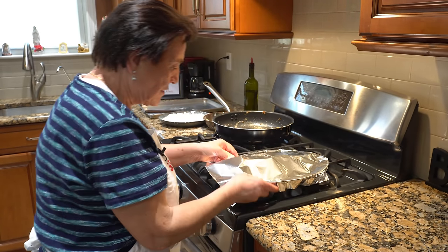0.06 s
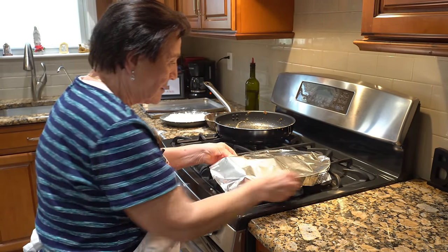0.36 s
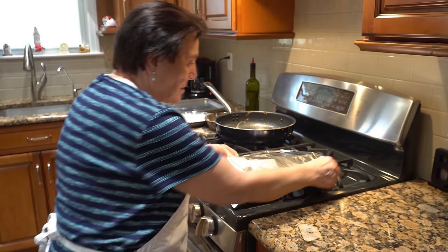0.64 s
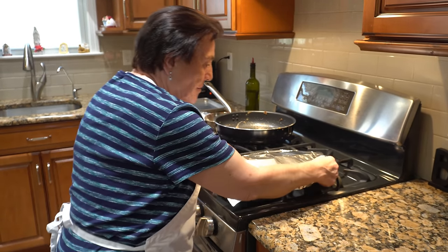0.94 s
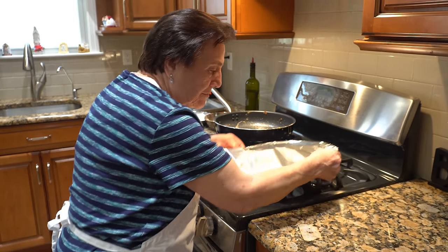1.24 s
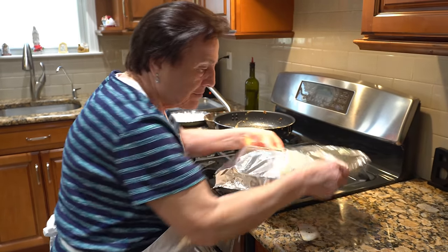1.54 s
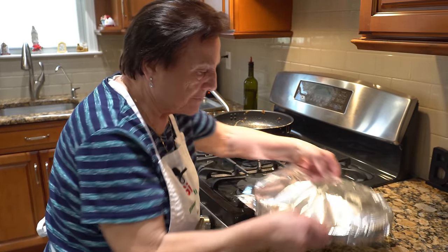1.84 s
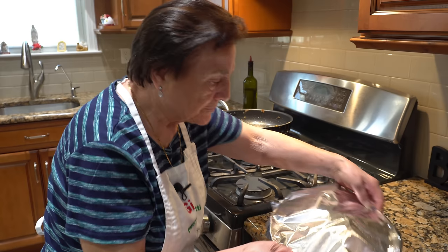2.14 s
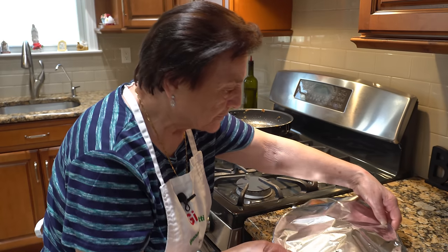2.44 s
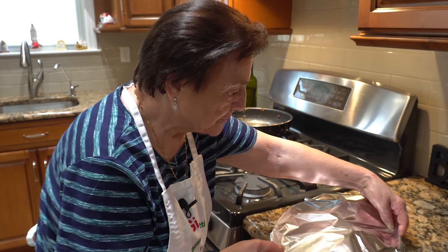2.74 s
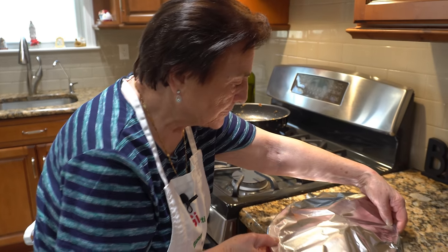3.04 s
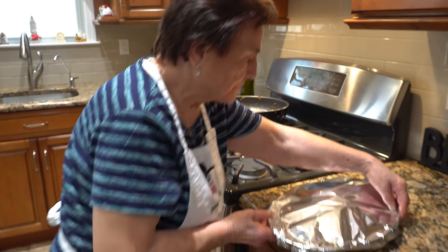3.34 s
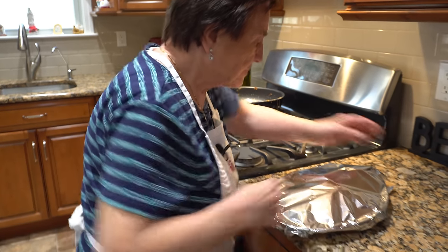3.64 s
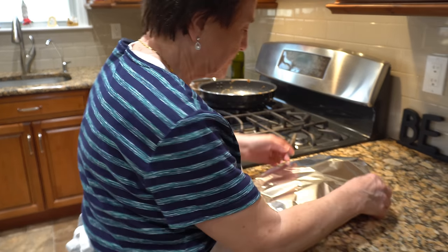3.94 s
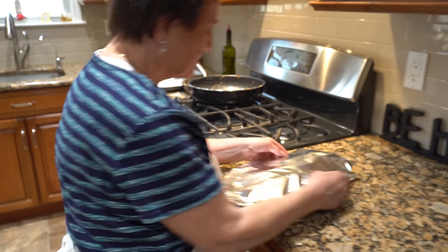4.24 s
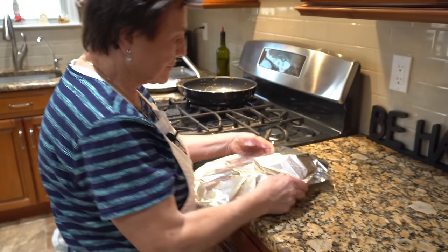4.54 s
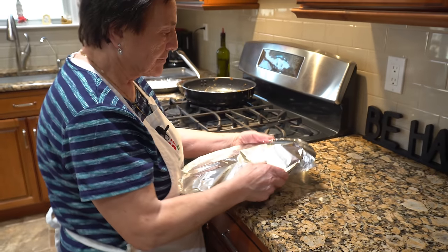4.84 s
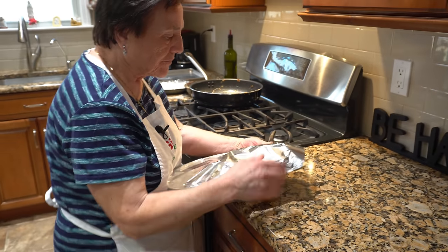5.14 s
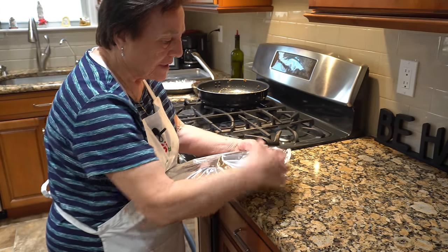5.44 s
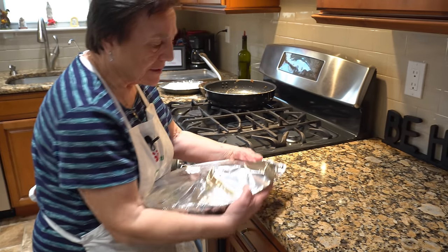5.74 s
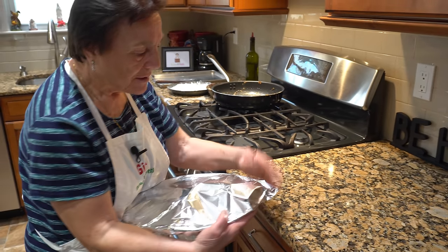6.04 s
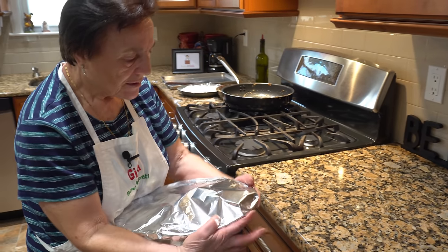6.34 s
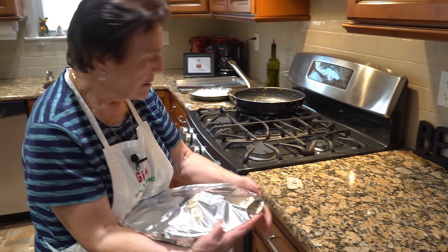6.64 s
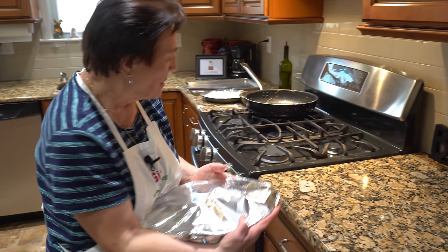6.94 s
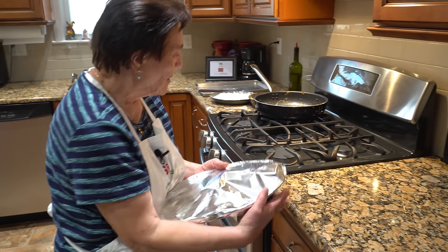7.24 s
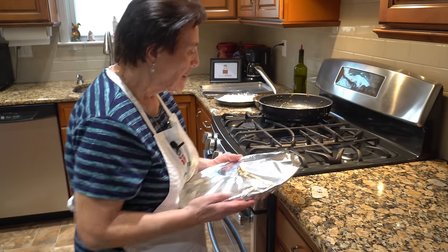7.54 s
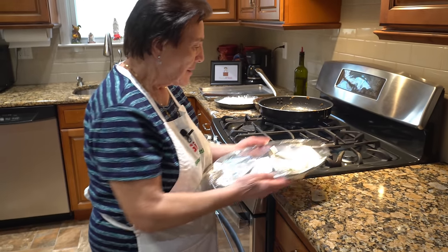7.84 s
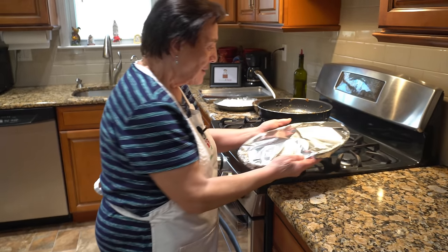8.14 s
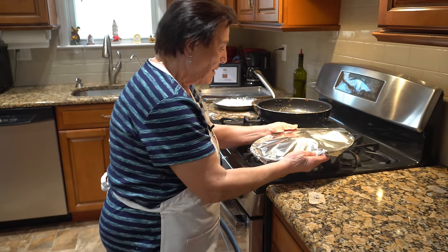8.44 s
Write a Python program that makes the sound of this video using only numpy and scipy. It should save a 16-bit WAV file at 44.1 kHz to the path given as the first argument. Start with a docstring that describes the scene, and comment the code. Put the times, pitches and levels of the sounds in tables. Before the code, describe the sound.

Close by in a small, quiet kitchen, fingers press aluminium foil over a ceramic dish, making bright bursts of crinkling and single snaps. The dish squeaks faintly on a stove grate, then lands on a stone counter with one sharp knock. It scrapes and clunks briefly as the crinkling grows louder and busier, and a light clink comes at the end.

```python
"""Crimping foil over a dish

Fingers press aluminium foil over a ceramic dish in a small tiled kitchen; creases buckle in swarms
and single snaps. The dish squeaks off the stove grate, knocks down on the stone counter, is dragged
off its edge and clinks back on the stove. Hands and cloth add soft low bumps over a quiet room."""
import sys
import numpy as np
from scipy import signal
from scipy.fft import rfft, irfft, next_fast_len
from scipy.io import wavfile
from scipy.ndimage import uniform_filter1d, map_coordinates

SR = 44100
rng = np.random.default_rng(int(sys.argv[2]) if len(sys.argv) > 2 else 0)


def bounce(signal):
    """Save signal as a 16-bit WAV file at the path given by the first command-line argument."""
    frames = np.transpose(np.atleast_2d(signal))
    limited = np.clip(frames, -1, 1)
    pcm = np.round(limited * 32767).astype(np.int16)
    wavfile.write(sys.argv[1], SR, pcm)


N = 383042

# Fingers squeezing the foil. Each row: start and length in seconds, then crinkle level,
# top-octave shelf and flexing of the whole sheet, all in relative dB.
SQUEEZES = [(0, 0.11, -35, 11.5, -50.5), (0.168, 0.22, -37.5, 2, -43.5), (0.314, 0.12, -36.5, 9.5, -52.5),
            (0.541, 0.021, -48.5, 6, -55), (0.731, 0.11, -42, 8, -50.5), (0.802, .055, -36.5, 7, -52),
            (0.888, 0.12, -41, 5.5, -45.5), (1.46, .03, -53, -12, -51), (1.647, 0.084, -44, 8.5, -57),
            (1.85, 0.029, -40, 9.5, -52), (2.044, 0.03, -41, 5, -59.5), (2.146, 0.029, -44, -12, -50),
            (2.479, 0.038, -51.5, 0.5, -79), (2.892, 0.21, -49.5, -7, -52.5), (3.105, 0.044, -33, -1, -55),
            (3.163, .17, -41, 0, -41), (3.38, 0.035, -43.5, 3.5, -52.5), (3.446, 0.012, -39, 6.5, -48.5),
            (3.985, 0.15, -37.5, -1.5, -53.5), (4.038, 0.1, -34.5, 2.5, -52),
            (4.106, 0.16, -32.5, 6.5, -47), (4.261, .26, -35.5, 1.5, -41), (4.661, 0.13, -31.5, 9.5, -44),
            (4.889, 0.095, -35.5, 8, -51.5), (4.969, .11, -39, 1.5, -53), (5.447, 0.042, -27, 10.5, -35),
            (5.546, .1, -32, 4.5, -40.5), (5.687, 0.11, -43, -9, -54.5), (5.859, 0.065, -43, -10, -55),
            (6.102, .025, -37.5, 3, -35), (6.121, 0.054, -28.5, 6.5, -42), (6.231, 0.074, -36, -7, -45),
            (6.303, 0.12, -35, 0, -44.5), (6.438, .06, -46.5, 1.5, -52), (6.567, 0.057, -33.5, 0.5, -44.5),
            (6.647, 0.057, -44, -24, -52.5), (6.878, 0.046, -33.5, 8, -39.5),
            (6.898, 0.076, -30.5, 9.5, -46), (6.996, 0.065, -36, 1, -47), (7.069, 0.12, -30, 8, -41),
            (7.223, 0.028, -39.5, -2, -53), (7.478, 0.026, -33, 1, -45), (7.561, 0.13, -42, -1.5, -52),
            (7.804, .03, -55.5, -26, -64), (7.972, 0.031, -46.5, -3, -58), (8.27, .04, -47, 4.5, -58),
            (8.372, 0.043, -50, -15, -80), (8.503, 0.11, -45, 2, -52), (8.625, 0.025, -43.5, 4, -37)]
# Faint foil rustle under hands that only hold the dish. Each row: time in seconds, level in dB.
GRIP_RUSTLE = [(0, -32), (.5, -56.5), (1.1, -45.5), (1.38, -60.5), (1.95, -48.5), (2.42, -65.5), (3.4, -47),
               (3.68, -73), (3.95, -63.5), (4.55, -45.5), (5.2, -58), (5.85, -47), (6.04, -70), (6.5, -48),
               (6.85, -59.5), (7.42, -66), (7.75, -50.5), (8.68, -65.5)]
# Single creases giving way. Each row: start in seconds, level in dB, top-octave shelf in dB,
# time to die by 60 dB (t60) in seconds.
CREASE_SNAPS = [(0.1968, -34, 6, 0.091), (0.5197, -41.5, -2, 0.14), (.6478, -41, 3.5, 0.35),
                (0.9124, -38.5, 15.5, 0.12), (1.0669, -32, 7, 0.13), (1.1412, -32, 3, 0.14),
                (1.2692, -47.5, 8, 0.2), (1.2923, -44, 1.5, 0.14), (1.4053, -38, 2, .16),
                (1.5164, -47.5, 8, .088), (1.8112, -38.5, 11, 0.23), (2.0271, -41.5, 14.5, .21),
                (2.1842, -38.5, 1.5, 0.12), (2.3061, -44.5, -1, 0.095), (2.4663, -48, -10, 0.13),
                (2.5975, -45.5, 16, 0.04), (2.646, -41.5, -2, 0.34), (2.7614, -36, 5, 0.086),
                (2.8706, -45.5, 8, 0.06), (2.8874, -41, -1, .045), (3.375, -28.5, 5, .027),
                (3.483, -29, -14, .032), (4.1747, -37, 1, .03), (4.4122, -35, 15.5, 0.36),
                (4.758, -28, 3, 0.031), (4.789, -24.5, -7, 0.041), (4.899, -34.5, 10.5, .1),
                (5.2383, -46.5, 4, 0.099), (5.3013, -39.5, -6.5, 0.28), (5.592, -32.5, -13, .1),
                (5.748, -31, 8, .15), (5.765, -28.5, 1, 0.017), (5.7868, -28.5, -11, .02),
                (5.918, -36.5, 4.5, 0.082), (6.1037, -38.5, -2.5, .15), (6.3192, -24.5, -7.5, 0.03),
                (6.365, -27, -14, .06), (6.385, -28.5, 10.5, 0.17), (6.5391, -36.5, -4, 0.034),
                (6.5999, -36, 15, 0.11), (6.678, -36, 3.5, 0.2), (6.859, -45, -5, 0.26),
                (7.0412, -27.5, 13, 0.099), (7.1878, -27.5, 7, 0.059), (7.2433, -31, 8, .1),
                (7.487, -31.5, 0, 0.32), (7.742, -34.5, 7, 0.1), (8.1175, -51.5, 15.5, .066),
                (8.1764, -42.5, 13.5, .1), (8.365, -41.5, 6.5, 0.13), (8.4824, -48.5, 7, .17),
                (8.5035, -38, 2.5, .2)]
# Tone of the fine creases and of the whole sheet. Each row: frequency in Hz, relative gain in dB.
CREASE_EQ = [(400, -31.5), (900, -8), (1400, -2), (2000, 2.5), (2800, 2.5), (4000, 3), (6000, -0.5),
             (9000, -7.5), (12000, -11), (14500, -16), (16000, -25)]
SHEET_EQ = [(80, -21), (160, -16), (260, -2), (400, 0), (560, 2), (800, -1.5), (1100, -6.5), (1500, -3),
            (1900, -1), (3500, -52)]
# The dish meeting grate and counter. Each row: start in seconds, relative level in dB,
# clink over clunk in dB.
DISH_HITS = [(0.228, -32, 3), (0.952, -24.5, -3), (2.153, -42, 2), (2.646, -30, -8), (2.858, -32.5, -7),
             (3.1124, -12, 1), (3.119, -8, 2.5), (3.1338, -12.5, -11), (3.293, -25.5, -3.5),
             (4.174, -18.5, 2.5), (4.29, -32.5, 12.5), (4.384, -20, -8), (4.394, -27, -6),
             (4.403, -16.5, -19), (5.107, -32.5, -15), (8.628, -23.5, 9), (8.654, -30.5, -16),
             (8.674, -37, -11)]
# Modes of the dish and what it lands on. Each row: pitch in Hz, relative level in dB, t60 in seconds.
DISH_MODES = [(188, -12, .12), (404, -13, .11), (660, -13, .06), (735, -3, .07), (876, -3, .08),
              (925, -5, .07), (1094, -17, .08), (1200, -15, .07), (1368, -16, .08), (1500, -16, .08),
              (1585, -8, .08), (1688, 1, .06), (1765, -14, .05), (2405, -19, .08), (2611, -5.5, .07)]
# The dish scraping the counter, making the iron grate sing, and squeaking on it.
# Each row: time in seconds, level in dB.
SCRAPE_FADER = [(4.18, -44), (4.26, -44), (4.285, -36), (4.34, -32), (4.375, -27), (4.41, -26.5),
                (4.425, -37), (4.50, -45), (4.56, -60)]
GRATE_FADER = [(0, -53), (0.45, -55), (0.62, -62), (0.8, -55), (1.1, -60), (1.9, -67)]
SQUEAK_FADER = [(0.09, -72), (0.105, -36), (0.13, -34.5), (0.15, -46), (0.18, -71)]
# Tone of the dish's foot on stone. Each row: frequency in Hz, relative gain in dB.
SCRAPE_EQ = [(80, -23), (170, -21), (240, -1), (320, -12), (400, 2.5), (480, -4), (650, 1), (760, -13),
             (850, 5.5), (980, -7), (1180, -5), (1450, -24), (1750, -6), (2100, -25), (3000, -24),
             (6000, -64.5)]
# Arms and apron moving. Each row: time in seconds, level in dB.
CLOTH_FADER = [(0, -79), (.75, -55.5), (1.0, -49), (1.25, -57.5), (2.2, -58), (2.4, -77), (3.05, -66.5),
               (3.2, -53.5), (3.9, -56), (4.42, -47), (4.65, -68), (5.43, -61.5), (5.62, -46), (6.05, -65),
               (7.35, -61), (7.6, -52), (8.1, -69), (8.68, -72)]
# Soft bumps of hands and body. Each row: start in seconds, relative level in dB, pitch in Hz.
BODY_BUMPS = [(0.953, -39, 90), (1.005, -37, 60), (1.31, -44, 202), (3.12, -32, 86), (3.596, -43, 69.5),
              (3.771, -38.5, 172), (3.846, -43, 327), (3.921, -40, 315), (4.036, -44, 85.5),
              (5.47, -38.5, 70), (7.408, -43.5, 217), (7.514, -40, 49), (7.643, -39, 190)]
# Tone of the handling rumble and of the room's air. Each row: frequency in Hz, relative gain in dB.
RUMBLE_EQ = [(12, -27.5), (22, 4.5), (50, 4), (100, 0.5), (170, -3), (260, -9.5), (500, -47)]
AIR_EQ = [(25, 6.5), (100, 0.5), (300, -5.5), (600, -1), (1000, -3), (2200, -3.5), (4000, -16.5),
          (10000, -23), (16000, -29)]
# The kitchen's reverb tail. Each row: frequency in Hz, t60 in seconds.
KITCHEN_DECAY = [(150, 0.28), (1000, 0.55), (3000, 0.45), (7000, 0.24), (15000, 0.025)]

CREASES_PER_S, CREASE_GROWTH, MEDIUM_PRESS_DB = 2600, .4, -36  # rate at a medium press; its power law
ATTACK_S, ATTACK_SHARE = .012, 0.13  # a squeeze builds in this time plus a share of its length
SAG_DB_PER_S, RELEASE_DB_PER_S = 8.5, 231.5  # it eases while held, then lets go
TOP_RELEASE_DB_PER_S, FLEX_RELEASE_DB_PER_S = 326.5, 143.5  # fine creases stop first, the sheet last
UNEVEN_DB, UNEVEN_PER_S = 1.12, 50  # fingers never press quite evenly
GRIP_TOP_DB, GRIP_FLEX_DB = -13, -6.5  # light holding is dull and hardly flexes the sheet


def foil_crinkle(press_db, top_db, flex_db):
    """Harder pressing buckles more creases a second, while the whole sheet crackles lower down."""
    force_db = press_db - MEDIUM_PRESS_DB
    rate = CREASES_PER_S * amp(CREASE_GROWTH * force_db)
    creases = unit(eq(click_swarm(rate, spread_db=6.5, ring_db=5, facets=5), CREASE_EQ))
    panels = amp(-2.5 + 0.41 * force_db) * panel_pings(per_s=24, centre_hz=2670, t60=0.044)
    sheet = unit(eq(click_swarm(rate, spread_db=6, ring_db=6.5), SHEET_EQ))
    return amp(press_db - 0.5) * (top_shelf(creases, top_db) + panels) + amp(flex_db - 1.0) * sheet


def click_swarm(per_s, spread_db, ring_db, facets=3, t60=0.03, block=4096):
    """Uneven clicks at a steady mean level; each block has a few facets, each with its own ring."""
    clicks = (rng.random(N) < per_s / SR) * amp(spread_db * np.clip(rng.standard_normal(N), -2, 2.3))
    blocks = np.pad(clicks, (0, -N % block)).reshape(-1, block)
    facet_clicks = blocks * (rng.integers(facets, size=blocks.shape) == np.arange(facets)[:, None, None])
    t = np.arange(block + 1) / SR
    rings = rng.standard_normal((facets, len(blocks), len(t))) * amp(-60 * t / t60)
    rings *= amp(ring_db) / np.linalg.norm(rings, axis=2, keepdims=True)
    rings[:, :, 0] += rng.choice([-1, 1], rings.shape[:2])  # the bare click ahead of its ring
    rung = signal.fftconvolve(facet_clicks, rings, axes=2).sum(axis=0)
    spill = np.roll(rung[:, block:], 1, axis=0)  # tails run on into the next block
    crackle = unit((rung[:, :block] + spill).ravel()[:N])
    power = np.abs(uniform_filter1d(uniform_filter1d(crackle ** 2, size=1500), size=1500))
    return unit(crackle / np.sqrt(power + 0.04))


def panel_pings(per_s, centre_hz, t60):
    """Now and then a flat panel of foil flips over with a short pitched ping."""
    out, t = np.zeros(N), np.arange(SR // 20) / SR
    for when, pitch, size in rng.random((int(per_s * N / SR), 3)):
        hz = centre_hz * 2 ** (pitch - .5)
        add(out, when * N / SR, size ** 2 * np.sin(2 * np.pi * hz * t) * amp(-60 * t / t60))
    return out


def finger_pressure():
    """The fingers ride three controls, in dB: crinkle level, top-octave shelf and sheet flex."""
    level_db, top_db, flex_db = np.transpose(SQUEEZES)[2:]
    press = squeeze_envelope_db(level_db, RELEASE_DB_PER_S, grip_db=0)
    top = squeeze_envelope_db(level_db + top_db, TOP_RELEASE_DB_PER_S, GRIP_TOP_DB)
    flex = squeeze_envelope_db(flex_db, FLEX_RELEASE_DB_PER_S, GRIP_FLEX_DB)
    wobble = map_coordinates(rng.standard_normal(1024), [np.arange(N) * UNEVEN_PER_S / SR], mode="wrap")
    return press + UNEVEN_DB * wobble, top - press, flex


def squeeze_envelope_db(levels_db, release_db_per_s, grip_db):
    """Each squeeze swells, sags and lets go, on top of the rustle of the grip."""
    t = np.arange(SR) / SR
    power = amp(automation(GRIP_RUSTLE) + grip_db) ** 2
    for (start, length, *_), db in zip(SQUEEZES, levels_db):
        fall_db = SAG_DB_PER_S * t + release_db_per_s * np.maximum(t - length, 0)
        rise = np.minimum(t / (ATTACK_S + ATTACK_SHARE * length), 1)
        add(power, start, (rise * amp(db - fall_db)) ** 2)
    return 10 * np.log10(power)


def crease_snaps():
    """A crease pops with a sharp tick and sets off a dying shiver of the sheet."""
    out, t = np.zeros(N), np.arange(SR // 5) / SR
    shiver_eq = [(100, -6.5), (400, 0.5), (1200, -1), (2500, 6.5), (4500, 5.5), (8000, -2.5),
                 (15000, -16)]
    tick = .5 * amp(-60 * t / 0.00052)
    for start, db, top_db, t60 in CREASE_SNAPS:
        grains = rng.standard_normal(len(t)) * amp(2.7 * rng.standard_normal(len(t)))
        shiver = top_shelf(unit(eq(grains, shiver_eq)), top_db)
        add(out, start, amp(db) * shiver * (amp(-60 * t / t60) + tick))
    return out


def dish_knocks(clink_above_hz=1450):
    """Each hit rings the dish's modes: a hard edge favours the clink, a flat landing the low clunk."""
    out, t = np.zeros(N), np.arange(SR // 5) / SR
    hz, level_db, t60 = np.transpose(DISH_MODES)[:, :, None]
    polarity = (-1) ** np.arange(len(hz))[:, None]
    thud_eq = [(60, -16.5), (200, 2), (500, 0), (900, 6.0), (1800, 2), (3000, -19), (7000, -35.0)]
    attack = 1 - np.exp(-t / .0004)
    for start, db, clink_db in DISH_HITS:
        strength_db = level_db + clink_db * (hz > clink_above_hz) + rng.normal(0, 1, hz.shape)
        # Hands and loose foil load the dish, so its modes waver.
        waver = .03 * np.cumsum(rng.standard_normal((len(hz), len(t))), axis=1)
        modes = polarity * amp(strength_db - 60 * t / t60) * np.sin(2 * np.pi * hz * t + waver)
        thud = unit(eq(rng.standard_normal(len(t)), thud_eq)) * amp(-60 * t / 0.14)
        add(out, start, amp(db - 6.5) * (modes.sum(axis=0) + .5 * thud) * attack)
    return out


def dish_drag(grate_hz=830, grate_q=18, squeak_hz=597):
    """The dish's foot sticks and slips on stone; on the iron grate it rings the bars and squeaks once."""
    slips = unit(eq(click_swarm(per_s=600, spread_db=4.5, ring_db=-2.0), SCRAPE_EQ))
    bars = unit(signal.lfilter(*signal.iirpeak(grate_hz, grate_q, SR), rng.standard_normal(N)))
    jitter = np.cumsum(rng.normal(0, .04, N))
    squeak = np.sqrt(2) * np.sin(2 * np.pi * squeak_hz * np.arange(N) / SR + jitter)
    return fader(SCRAPE_FADER) * slips + fader(GRATE_FADER) * bars + fader(SQUEAK_FADER) * squeak


def handling(flex_db, push_db=-7, lumps_per_s=22):
    """Lumpy low rustle of moving arms and of hands pushing as the sheet flexes, with a few dull bumps."""
    lumps_db = map_coordinates(rng.normal(0, 4, 300), [np.arange(N) * lumps_per_s / SR])
    rumble = unit(amp(lumps_db) * eq(rng.standard_normal(N), RUMBLE_EQ))
    out = np.hypot(amp(automation(CLOTH_FADER)), amp(flex_db + push_db)) * rumble
    t = np.arange(SR // 10) / SR
    for start, db, hz in BODY_BUMPS:
        envelope = np.exp(-t * hz / 0.67) * (1 - np.exp(-t / 0.0011))
        add(out, start, amp(db + 7.5) * np.sin(2 * np.pi * hz * t) * envelope)
    return out


def kitchen_reverb(send, predelay_s=.005, block=8192):
    """Tiles and cupboards give a short tail, treble dying first; the paths change as the cook moves."""
    out = np.zeros(N)
    for start in range(0, N, block):
        hz, t, noise = signal.stft(rng.standard_normal(SR // 2), SR, nperseg=256)
        decay = amp(-60 * t / at_hz(KITCHEN_DECAY, hz)[:, None])
        tail = signal.istft(noise * decay, SR, nperseg=256)[1]
        wet = signal.fftconvolve(send[start:start + block], tail / np.linalg.norm(tail))
        add(out, start / SR + predelay_s, wet)
    return out


def room_air():
    """A faint, steady bed of dark room tone."""
    return amp(-63.0) * unit(eq(rng.standard_normal(N), AIR_EQ))


def amp(db):
    return 10 ** (np.asarray(db) / 20)


def unit(x):
    return x / np.sqrt(np.mean(x ** 2) + 1e-20)


def at_hz(points, hz):
    """Read (Hz, value) points along a log frequency axis."""
    point_hz, values = np.transpose(points)
    return np.interp(np.log(hz + 1), np.log(point_hz + 1), values)


def automation(rows, outside=None):
    """Level in dB at every sample; the ends hold unless an outside level is given."""
    times, db = np.transpose(rows)
    return np.interp(np.arange(N) / SR, times, db, left=outside, right=outside)


def fader(rows):
    """Gain from (seconds, dB) rows, silent outside them."""
    return amp(automation(rows, outside=-np.inf))


def add(track, start_s, sound):
    """Mix a sound into the track."""
    part = track[max(round(start_s * SR), 0):][:len(sound)]
    part += sound[:len(part)]


def eq(x, curve):
    """Minimum-phase EQ through (Hz, dB) points, so nothing rings ahead of a click."""
    size = 2 * next_fast_len(len(x) // 2 + 4096, True)
    gain = amp(at_hz(curve, np.fft.rfftfreq(size, 1 / SR)))
    cepstrum = irfft(np.log(gain + 1e-6))
    cepstrum[1:size // 2] *= 2
    cepstrum[size // 2 + 1:] = 0
    return irfft(rfft(x, size) * np.exp(rfft(cepstrum)))[:len(x)]


def top_shelf(x, top_db, corner_hz=7500):
    """Boost or cut the top octave."""
    size = next_fast_len(len(x), True)
    hz = np.fft.rfftfreq(size, 1 / SR)
    top = irfft(rfft(x, size) * hz ** 4 / (hz ** 4 + corner_hz ** 4), size)[:len(x)]
    return x + (amp(top_db) - 1) * top


def scene():
    """Mono mix: foil and dish up front with a little kitchen reverb, handling and air underneath."""
    press_db, top_db, flex_db = finger_pressure()
    foil = foil_crinkle(press_db, top_db, flex_db) + crease_snaps()
    dish = dish_knocks() + dish_drag()
    air = room_air()
    reverb = kitchen_reverb(amp(-16.5) * foil + amp(-14) * dish)
    return (foil + dish + reverb + handling(flex_db) + air)[None]


def record(dry):
    """A soft clip rounds off the loudest peaks, then a steep high cut takes off the very top."""
    ceiling, high_cut_hz = .56, 16100
    rounded = dry / (1 + (np.abs(dry) / ceiling) ** 4) ** .25
    size = next_fast_len(N + SR // 2)
    passband = np.fft.rfftfreq(size, 1 / SR) < high_cut_hz
    return irfft(rfft(rounded, size) * passband, size)[:, :N]


dry = scene()
out = record(dry)
bounce(out)
```